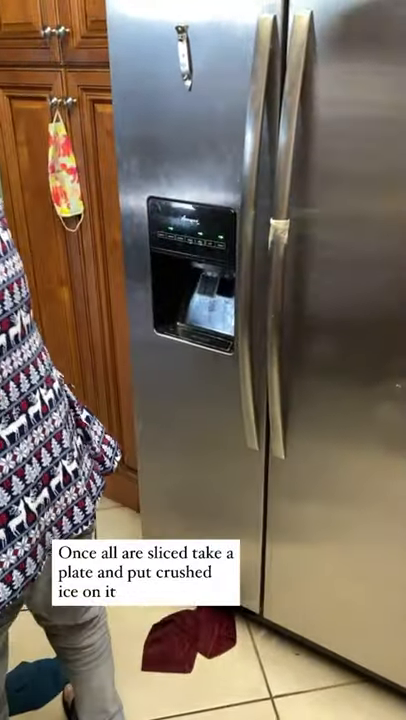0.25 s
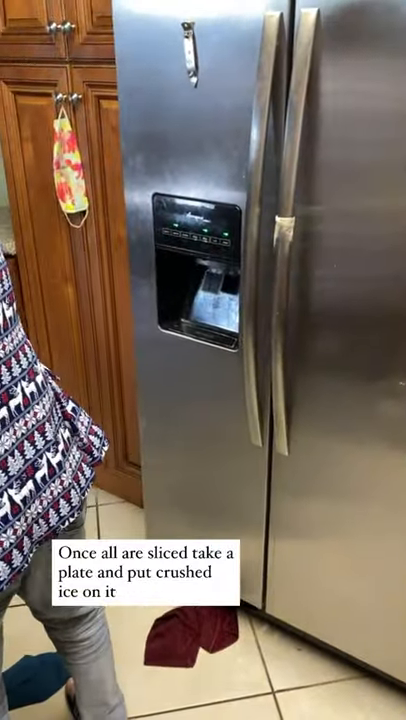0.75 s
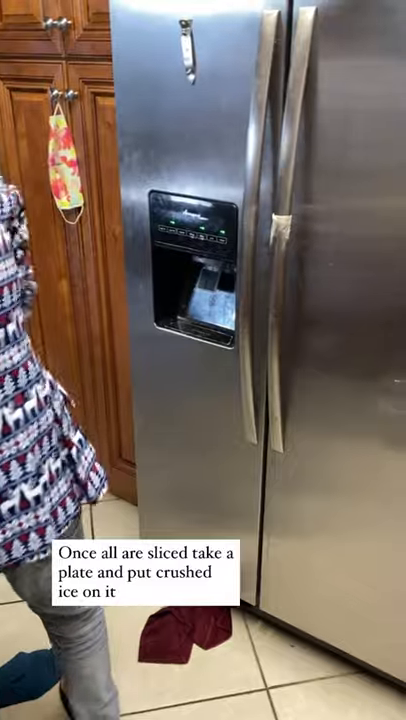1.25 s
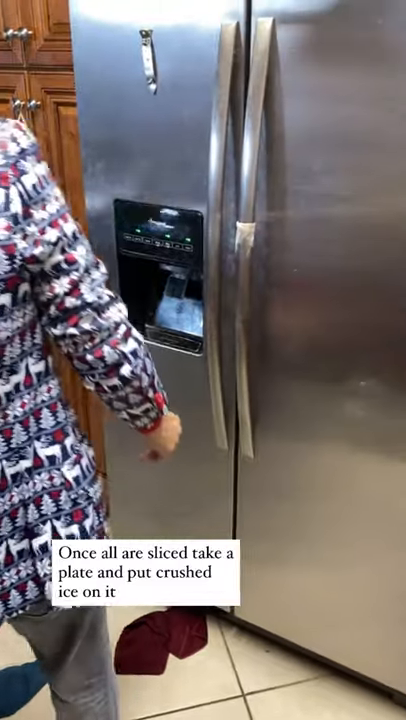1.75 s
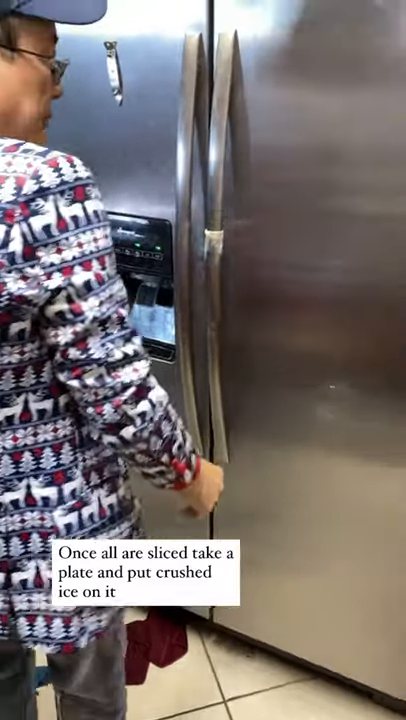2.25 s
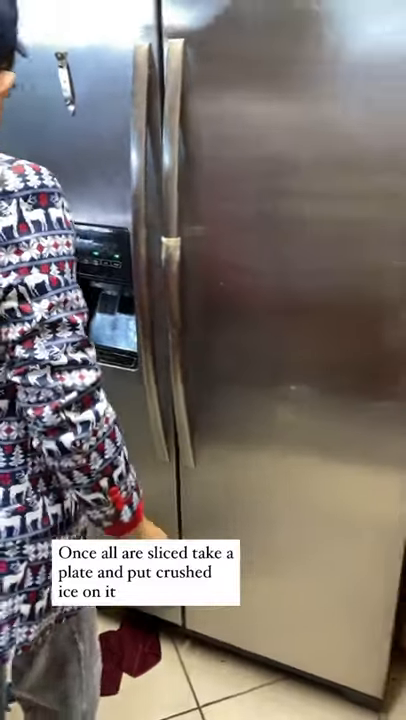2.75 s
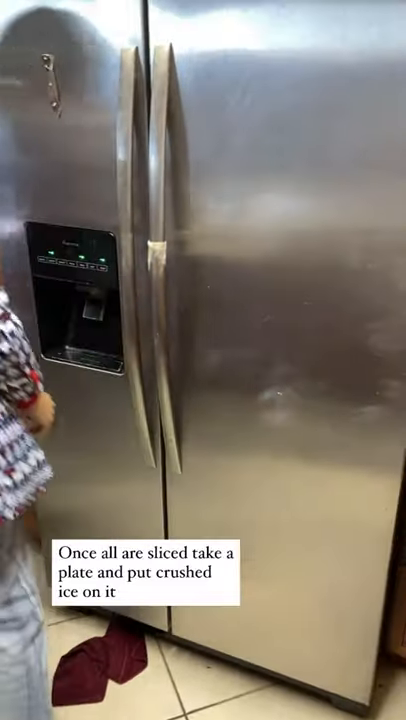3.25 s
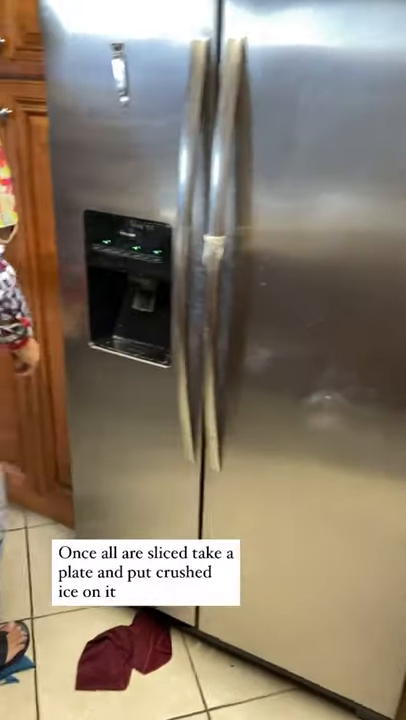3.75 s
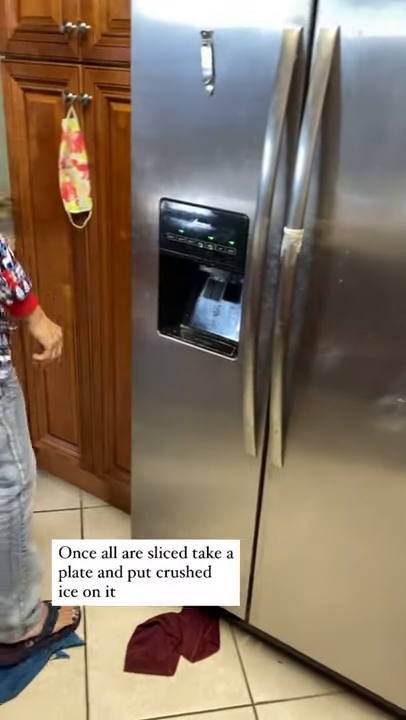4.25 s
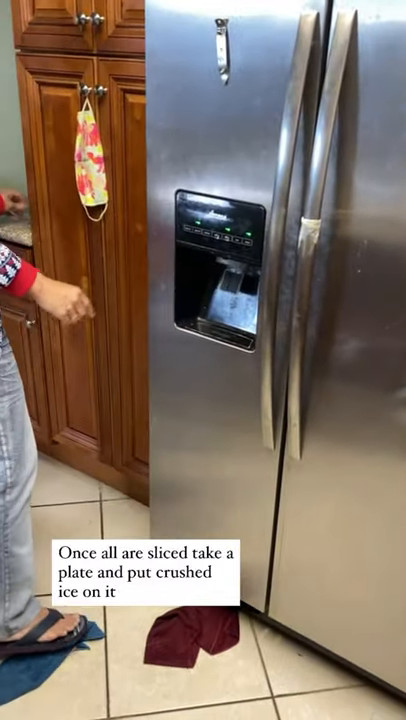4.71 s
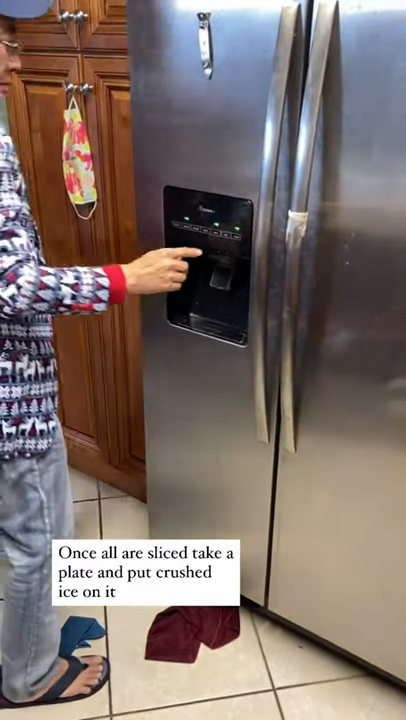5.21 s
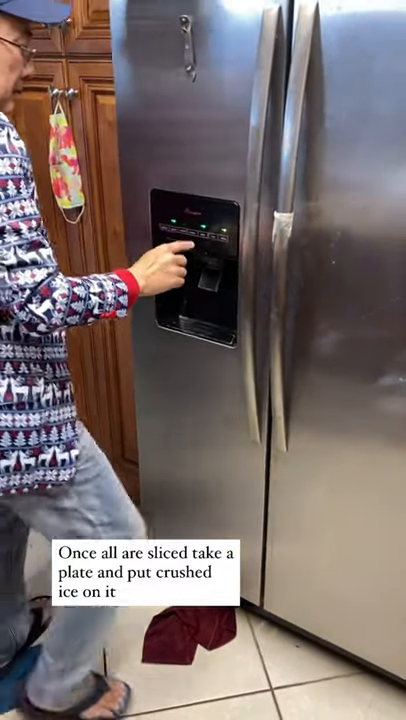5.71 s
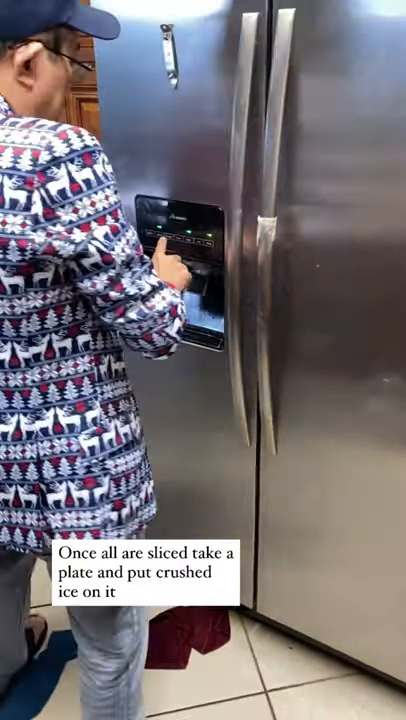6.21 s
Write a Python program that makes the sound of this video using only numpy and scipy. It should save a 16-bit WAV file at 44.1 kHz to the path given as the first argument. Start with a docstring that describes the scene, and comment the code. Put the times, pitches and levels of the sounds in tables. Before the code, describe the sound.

A plate is pulled clattering from a stack, after which someone in sandals walks about a tiled kitchen over faint refrigerator hum.

```python
"""Plates and footsteps in a tiled kitchen

Two china plates clatter as one is taken from a stack: each clash rings fading modes and knocks the shelf.
Someone in sandals walks about: shaped pulses slap and thud, runs of tiny slips scuff and tick.
A cupboard door knocks with modes of its own; shaped noise makes the rustling clothes and room rumble.
Two wavering tones are the refrigerator. A hand-held camera with two microphone ports hears it all.
"""
import sys
import numpy as np
from scipy import signal
from scipy.fft import rfft, irfft, next_fast_len
from scipy.io import wavfile
from scipy.ndimage import uniform_filter1d

SR = 44100
rng = np.random.default_rng(int(sys.argv[2]) if len(sys.argv) > 2 else 0)


def inscribe(sig):
    """Save sig as 16-bit PCM at rate SR to the path in sys.argv[1].

    A 1-D sig is mono; a 2-D sig holds one channel per row.
    Samples are clipped to [-1, 1] before scaling.
    """
    pcm = np.round(np.clip(np.atleast_2d(sig).T, -1, 1) * 32767)
    wavfile.write(sys.argv[1], SR, pcm.astype(np.int16))


N = 285327  # samples in the scene
RING = np.arange(int(.8 * SR)) / SR  # a clock for short sounds, in seconds

# All levels in the tables are relative: each sound adds its own offset.
# Pitches (modes) at which each plate rings: [f/Hz, level/dB]
UPPER_PLATE_MODES = [(331, -19), (828, -17), (1206, -14), (1301, -13.5), (1522, -18), (2055, -17),
                     (2256, -12), (2369, 0), (2520, -14), (3200, -19), (3474, -13), (4205, -14),
                     (4842, -16), (4910, -12), (5912, -10.5), (6335, -15.5), (6500, -15.5), (7364, -17),
                     (7795, -14)]
LOWER_PLATE_MODES = [(333, -15), (511, -13), (1040, -12.5), (1350, -9), (1545, -11), (1876, -11),
                     (2335, -2), (2384, -6), (2530, -8), (2660, -8), (3352, -7), (3413, -4), (3555, -1),
                     (3810, -13.5), (4228, -12), (4616, -16), (4958, -8), (5030, -8.5), (6548, -9),
                     (7235, -16), (7377, -8), (7850, -15), (8424, -8), (8768, -12)]
# Clashes of the plates: [t/s, upper plate level/dB, lower plate level/dB, knock on the shelf level/dB]
CLASHES = [(0.1577, -18, -32, -15.5), (0.173, -16, -44, -27), (0.213, -20.5, -42.5, -37.5),
           (0.232, -21, -42.5, -33), (0.279, -27.5, -47.5, -36.5), (0.5946, -30, -35.5, -28.5),
           (0.6097, -24, -17.5, -19), (0.624, -29, -28.5, -34), (0.737, -46, -42.5, -34.5),
           (0.772, -53.5, -49, -37.5), (0.83, -53, -50.5, -54)]
# A plate drags over the stack: [t/s, level/dB]
PLATE_SLIDE = [(.505, -78), (.512, -39.5), (.59, -41.5), (.6, -76.5)]
# Footfalls on the tiles: [t/s, slap level/dB, heel thud level/dB, sole grip level/dB, delay of the grip/s]
STEPS = [(1.674, -42.5, -48, -39.5, 0.0032), (2.146, -25, -40, -34.5, 0.014),
         (3.133, -42, -65, -29.5, 0.0078), (3.593, -32.5, -37.5, -33, 0.00085),
         (3.931, -32.5, -42.5, -36.5, 0.013), (3.997, -34.5, -41, -45.5, 0.0058),
         (4.9321, -24.5, -55, -42, .015), (5.408, -31.5, -39, -36.5, 0.023),
         (5.831, -40.5, -47.5, -42, 0.025), (6.215, -41, -50, -41.5, 0.0079)]
# Sandals creak and drag between the steps: [t/s, level/dB, time to fade by 60 dB/s]
SCUFFS = [(1.22, -44, 0.37), (1.364, -39, 0.049), (1.767, -40.5, 0.17), (1.875, -35, 0.049),
          (2.307, -38.5, 0.024), (2.453, -39, 0.03), (2.581, -42.5, 0.03), (3.058, -43, 0.18),
          (3.19, -38, 0.23), (3.379, -42.5, 0.039), (3.753, -38.5, 0.046), (4.21, -45.5, 0.053),
          (5.062, -40, 0.12), (5.124, -36.5, 0.075), (5.553, -41.5, 0.096), (5.926, -48.5, 0.12),
          (6.091, -48.5, 0.13)]
# Sharp ticks and snaps, as of grit or a sandal's strap: [t/s, level/dB, centre f/Hz]
TICKS = [(0.059, -27.5, 8450), (1.38, -37, 4000), (1.878, -31.5, 3900), (1.896, -29, 3650),
         (1.915, -31.5, 3100), (2.312, -38, 2800), (2.452, -36, 3105), (3.137, -38, 3490), (3.6, -45, 4460),
         (3.952, -42, 5950), (4.949, -40, 6040), (5.125, -42, 2230), (5.84, -46, 7100)]
# The cupboard door meets its frame and settles: [t/s, catch clack level/dB, panel boom level/dB]
DOOR_KNOCKS = [(4.428, -37, -47), (4.443, -53, -42.5), (4.454, -45.5, -61)]
# Modes of the door's panel and of its catch: [f/Hz, level/dB]
PANEL_MODES = [(147, 0), (340, -2), (405, 1), (660, -4)]
CATCH_MODES = [(1010, -8), (1165, -10), (1400, -7), (1840, -9), (2410, -9), (2810, -10), (4815, -9.5),
               (8110, -16)]
# Rustle at the shelf while the plates are handled: [t/s, level/dB]
HANDLING = [(0, -41.5), (0.45, -54), (1.0, -89)]
# Slow changes of the refrigerator's hum: [t/s, level/dB]
HUM_LEVEL = [(0, -68), (1.7, -53), (3, -67.5)]
# Colours, the balance of low and high in each sound: [f/Hz, level/dB]
SHELF_COLOUR = [(100, -27.5), (340, -3.5), (900, 3.5), (1800, -1), (5000, -14), (12000, -43.5)]
SLAP_COLOUR = [(100, -25), (550, 10.5), (900, 3.5), (1600, 2.5), (2800, -18.5), (11000, -49.5)]
THUD_COLOUR = [(40, -16.5), (130, -2), (500, -12.5), (2000, -40)]
SCUFF_COLOUR = [(200, -31.5), (900, 0), (3000, 9), (6500, 4), (8500, -22.5), (12000, -28)]
PANEL_COLOUR = [(60, -27), (150, -7.5), (1200, 3.5), (4500, -11.5), (6000, -60)]
RUSTLE_COLOUR = [(200, -10.5), (700, 7.5), (3000, 2), (6500, -7), (12000, -31.5)]
SLEEVE_COLOUR = [(100, -8.5), (400, 0.5), (3000, 1), (11000, -22)]
SHUFFLE_COLOUR = [(80, -18.5), (230, -1.5), (650, -10.5), (2000, -39.5)]
RUMBLE_COLOUR = [(20, -7.5), (55, 2), (160, 0.5), (600, -48.5)]
# How long the room's echoes last: [f/Hz, time to fade by 60 dB/s]
KITCHEN_T60 = [(400, 0.6), (3000, 0.51), (6000, 0.51), (12000, 0.082)]
# The stereo balance: side minus mid [f/Hz, level/dB], then left minus right [f/Hz, level/dB]
WIDTH = [(270, -16), (630, -3), (1130, -8), (1900, -6.5), (3200, 2), (6590, 4.5), (8200, 17)]
LEAN = [(100, 0), (500, 2.5), (1130, 3), (2040, 0.5)]

GRIP_T60_S = 0.024  # the sole's grip fades by 60 dB in this time
SLIPS_PER_S, SLIP_SPREAD_DB = 800, 4
# Above DULL_HZ a softer blow loses this many dB per octave, for each dB it is below the hardest
DULL_HZ, DULLING = 2430, 0.12
STRIKE_SPREAD_DB = 4.5  # each blow favours other modes
PASS_S, PASS_WIDTH_S, PASS_DB, SHUFFLE_DB = 3.33, 0.35, 6, -58  # feet swell as they pass the camera
CLOTH_DB, CRINKLES_PER_S = -64, 390  # steady rustle, and how fast its fine grain varies
TOP_HZ = 12200  # the camera's band limit


def plates():
    """Each clash rings both plates and chatters through the stack into the shelf; a plate also slides."""
    times, upper_db, lower_db, knock_db = np.transpose(CLASHES)
    upper_blows = list(zip(times, upper_db))
    lower_blows = list(zip(times, lower_db))
    out = rattled(UPPER_PLATE_MODES, upper_blows, sustain=0.28, beat_rate=130, diffuse=3.3, attack=0.0038)
    out += rattled(LOWER_PLATE_MODES, lower_blows, sustain=.54, beat_rate=160, diffuse=1.8, attack=.001)
    for s, db in zip(times, knock_db):
        # the hard rims crack together
        crack = heard([1], SCUFF_COLOUR, near_db=0.5, far_db=-13.5)
        add(out, s, amp(db - 17) * crack)
        force = chatter(rise=0.0003, t60=0.018, grain_db=2)
        knock = heard(force, SHELF_COLOUR, near_db=-1.5, far_db=-7.5)
        add(out, s, amp(db + 0.5) * knock)
    slide = rush([(250, -15.0), (600, 3.0), (1250, -1.0), (4000, -32)])
    slide_db = curves(PLATE_SLIDE)[0] + 3.5 * wobble(180, N)
    return out + slide * amp(slide_db)


def steps():
    """The sole slaps and the heel thuds with it; a hard slap is brief and stands out from its echoes."""
    out = np.zeros((2, N))
    for s, slap_db, thud_db, _, _ in STEPS:
        soft_db = np.clip(-28 - slap_db, -2, 12)  # how much softer than a hard slap
        tail_gain = .25 * np.clip(soft_db / 4, 0, 1)
        force = np.r_[1, tail_gain * chatter(rise=.001, t60=.02, grain_db=3)]
        near_db, far_db = 0.14 * soft_db - 0.5, 0.46 * soft_db - 7.5
        add(out, s, amp(slap_db - 13.5) * heard(force, SLAP_COLOUR, near_db, far_db))
        add(out, s, amp(thud_db - 9.5) * heard([1], THUD_COLOUR, near_db=3.5, far_db=4.0))
    return out


def scuffs():
    """The sole brushes the floor softly, then catches in a crackle; longer scuffs swell more slowly."""
    out = np.zeros((2, N))
    before = RING[SR // 16::-1]  # seconds left until the catch
    grips = [(s + delay, grip_db, GRIP_T60_S) for s, _, _, grip_db, delay in STEPS]
    for s, db, t60 in SCUFFS + grips:
        brush_db = -35 - 60 * before / .12 + 4 * wobble(400, len(before))
        brush = rng.standard_normal(len(before)) * amp(brush_db)
        force = np.r_[brush, crackle(np.clip(t60, .01, .3))]
        scuff = heard(force, SCUFF_COLOUR, near_db=-3.0, far_db=-1.5)
        add(out, s - before[0], amp(db - 8) * scuff)
    return out


def ticks():
    """Dry snaps, each a quick run of tiny slips round its own pitch."""
    out = np.zeros((2, N))
    for s, db, hz in TICKS:
        colour = [(hz / 10, -24), (hz, 0), (hz * 1.5, -7), (hz * 2.5, -32)]
        force = chatter(rise=0.0002, t60=0.007, grain_db=3)
        add(out, s, amp(db - 9.0) * heard(force, colour, near_db=-2.5, far_db=-8.5))
    return out


def cupboard():
    """The catch clacks and the panel booms; the door is off to one side, so mostly echoes arrive."""
    clacks = [(s, clack_db) for s, clack_db, _ in DOOR_KNOCKS]
    booms = [(s, boom_db) for s, _, boom_db in DOOR_KNOCKS]
    catch = rattled(CATCH_MODES, clacks, sustain=0.93, beat_rate=110.0, diffuse=2.7, attack=0.00069)
    panel = rattled(PANEL_MODES, booms, sustain=0.39, beat_rate=68.0, diffuse=0.9, attack=0.0028)
    out = amp(-6.0) * catch + amp(-2.5) * panel
    for s, db in clacks:
        add(out, s, amp(db - 12) * heard([1], PANEL_COLOUR, near_db=11.5, far_db=8.0))
    return out


def clothes():
    """Cloth and a sleeve at the shelf rustle: noise whose folds catch in tiny grains."""
    sleeve = amp(curves(HANDLING)[0]) * rush(SLEEVE_COLOUR)
    cloth = amp(CLOTH_DB) * rush(RUSTLE_COLOUR)
    grain = unit(amp(2.3 * wobble(25, N) + wobble(CRINKLES_PER_S, N)))
    return (cloth + sleeve) * grain


def shuffling_feet():
    """Patchy low noise that swells once as the feet pass the camera."""
    level_db = SHUFFLE_DB + PASS_DB * swell(PASS_S, PASS_WIDTH_S)
    return amp(level_db) * patchy(rush(SHUFFLE_COLOUR), depth_db=6.0)


def refrigerator(hum_hz=104, fan_hz=556):
    """The compressor and the fan are two sine tones with wavering phase, alike at both ports."""
    t = np.arange(N) / SR
    hum = np.sin(2 * np.pi * hum_hz * t + 0.55 * wobble(29, N))
    fan = np.sin(2 * np.pi * fan_hz * t + 1.5 * wobble(14, N))
    hum_gain = amp(curves(HUM_LEVEL)[0] + 3.5)
    fan_gain = amp(-68 + 2 * wobble(5, N))
    return np.outer([1, 0], hum_gain * hum + fan_gain * fan)  # mid only


def room_rumble():
    """Deep noise that wavers and slowly sinks in level."""
    return amp(np.linspace(-54, -59, N) + wobble(4.6, N)) * rush(RUMBLE_COLOUR)


def rattled(modes, blows, sustain, beat_rate, diffuse, attack):
    """Modes under (t/s, level/dB) blows: each tops up their energy unevenly, soft blows are dull."""
    times, levels = np.transpose(blows)
    at = np.round((times - times.min()) * SR).astype(int)
    soft = np.exp(-1 / (attack * SR))  # spreads each blow over the attack time in seconds
    out = np.zeros((2, N))

    def stored(pushes, t60):
        loss = amp(-60 / (t60 * SR)) ** 2
        return signal.lfilter([1], [1, -loss], pushes)

    for hz, db in modes:
        octaves_up = max(np.log2(hz / DULL_HZ), 0)
        dull_db = DULLING * (levels - levels.max()) * octaves_up
        spread_db = STRIKE_SPREAD_DB * rng.uniform(-1.1, 1, len(at))
        strikes = amp(levels + dull_db + spread_db)
        impulses = np.bincount(at, strikes ** 2, at.max() + len(RING))
        pushes = signal.lfilter([1 - soft], [1, -soft], impulses)
        room_t60 = along(KITCHEN_T60, hz)
        # the mode itself, plus a little that lingers in the room
        energy = stored(pushes, sustain * room_t60) + .04 * stored(pushes, 1.2 * room_t60)
        add(out, times.min(), amp(db) * ring(hz, np.sqrt(energy), beat_rate, diffuse))
    return out


def ring(hz, swing, beat_rate, diffuse):
    """One mode in mid and side, sized by swing; echoes make it beat at random."""
    size = len(swing)
    echoes = np.array([wobble(beat_rate, size) + 1j * wobble(beat_rate, size) for _ in range(2)])
    direct = np.exp(2j * np.pi * rng.random((2, 1)))
    carrier = np.exp(2j * np.pi * hz * np.arange(size) / SR)
    tone = (swing * carrier * (direct + diffuse * echoes)).real
    return unit(tone) * np.sqrt(np.mean(swing ** 2))


def chatter(rise, t60, grain_db):
    """A swelling and fading run of tiny uneven slips."""
    t = RING[:SR // 5]
    slips = rng.standard_normal(len(t)) * amp(grain_db * wobble(340, len(t)))
    return slips * (1 - np.exp(-t / rise)) * amp(-60 * t / t60)


def crackle(t60):
    """Separate slips that come at random, in clumps of strength, quickly swelling and then fading."""
    t = RING[:SR // 5]
    sizes = amp(SLIP_SPREAD_DB * (rng.standard_normal(len(t)) + wobble(140, len(t))))
    happens = rng.random(len(t)) < SLIPS_PER_S / SR
    slips = happens * rng.choice([-1, 1], len(t)) * sizes
    return slips * (1 - np.exp(-t / (.04 * t60))) * amp(-60 * t / t60)


def heard(force, colour, near_db, far_db):
    """A coloured force in the kitchen; its direct sound has the energy of 10 ms at rms 1."""
    sound = np.convolve(force, pulse(colour))
    sound *= np.sqrt(SR / 100) / np.linalg.norm(sound)
    return signal.fftconvolve(sound[None], kitchen(near_db, far_db), axes=1)


def kitchen(near_db, far_db, near_t60=0.15, gap=0.0025):
    """Mid and side response: direct sound, quick echoes off cabinets, then the tiled room's tail."""
    hz, t, z = signal.stft(rng.standard_normal((2, len(RING))), SR, nperseg=256)
    fade = amp(-60 * t / along(KITCHEN_T60, hz)[:, None])
    far = signal.istft(z * fade, SR, nperseg=256)[1][:, :len(RING)]
    near = rng.standard_normal(far.shape) * np.abs(rng.standard_normal(far.shape))
    near *= amp(-60 * RING / near_t60)
    build = 1 - np.exp(-(RING / gap) ** 2)  # echoes start after a short gap
    echoes = amp(near_db) * unit(near * build) + amp(far_db) * unit(far * build)
    response = echoes / np.sqrt(len(RING))
    response[0, 0] += 1
    response[1, :2] += [1, -1]  # the ports differ by the slope of the direct wave
    return response


def pulse(colour, size=2048):
    """The shortest pulse of this colour that starts at once (minimum phase)."""
    cepstrum = irfft(np.log(amp(along(colour, np.fft.rfftfreq(size, 1 / SR)))))
    fold = np.r_[1, np.full(size // 2 - 1, 2), np.zeros(size // 2)]
    return irfft(np.exp(rfft(cepstrum * fold)))


def rush(colour):
    """Coloured mid and side noise of rms 1."""
    noise = rng.standard_normal((2, N))
    return unit(filtered(noise, lambda hz: amp(along(colour, hz))))


def patchy(x, depth_db):
    """Random swells and dips in small patches of pitch and time."""
    z = signal.stft(x, nperseg=1024)[2]
    field = uniform_filter1d(rng.standard_normal(z.shape[1:]), size=2, axis=0)
    field = uniform_filter1d(field, size=5, axis=1)
    return unit(signal.istft(z * amp(depth_db * unit(field)), nperseg=1024)[1][:, :N])


def swell(s, width):
    """A bell-shaped rise and fall round time s."""
    return np.exp(-((np.arange(N) / SR - s) / width) ** 2)


def wobble(rate, size):
    """A random curve through rate knots a second."""
    knots = rng.standard_normal(size // 100)
    return np.interp(np.arange(size) * rate / SR, np.arange(len(knots)), knots)


def curves(rows):
    """One value per sample for each column after the time."""
    s, *cols = np.transpose(rows)
    return [np.interp(np.arange(N) / SR, s, c) for c in cols]


def along(points, hz):
    """Read a value between (f/Hz, value) points on a log frequency axis."""
    f, v = np.transpose(points)
    return np.interp(np.log(hz + 1), np.log(f + 1), v)


def filtered(x, response):
    """Scale each frequency of x by the response there."""
    m = next_fast_len(x.shape[-1] + 8192)
    return irfft(rfft(x, m) * response(np.fft.rfftfreq(m, 1 / SR)), m)[..., :x.shape[-1]]


def add(track, s, sound):
    """Mix a sound into a track from time s."""
    room_left = track[:, max(round(s * SR), 0):][:, :sound.shape[-1]]
    room_left += sound[..., :room_left.shape[1]]


def amp(db):
    """Decibels to gain."""
    return 10 ** (np.asarray(db) / 20)


def unit(x):
    """Scale each row to rms 1."""
    return x / np.sqrt(np.mean(np.abs(x) ** 2, axis=-1, keepdims=True) + 1e-20)


def scene():
    """Mix all sources in mid and side; bass sounds nearly alike left and right, while the top treble lies
    mostly in the side."""
    dry = plates() + steps() + scuffs() + ticks() + cupboard()
    dry += clothes() + shuffling_feet() + refrigerator() + room_rumble()

    def mid_side_gains(hz):
        angle = np.arctan(amp(along(WIDTH, hz)))
        return np.array([np.cos(angle), np.sin(angle)])

    mid, side = filtered(dry, mid_side_gains)
    ports = np.array([mid + side, mid - side])  # left, right
    return filtered(ports, lambda hz: amp(np.outer([.5, -.5], along(LEAN, hz))))


def record(dry):
    """The camera rounds off the highest peaks and keeps almost nothing above its band limit."""
    held = dry / (1 + (dry / .9) ** 6) ** (1 / 6)
    return filtered(held, lambda hz: 1 / (1 + (hz / TOP_HZ) ** 80))


dry = scene()
out = record(dry)
inscribe(out)
```